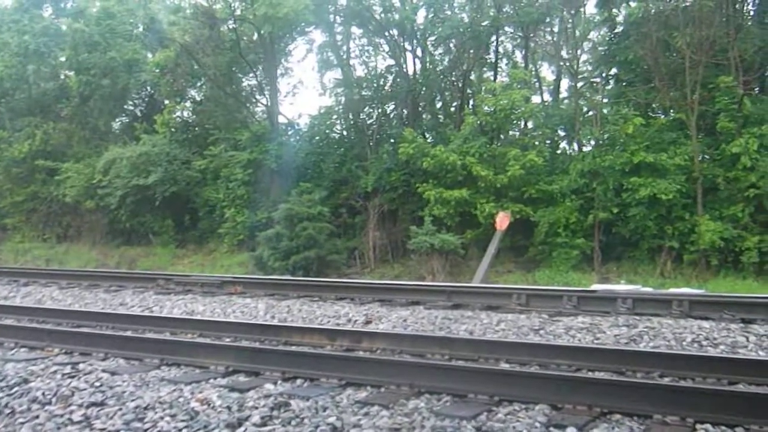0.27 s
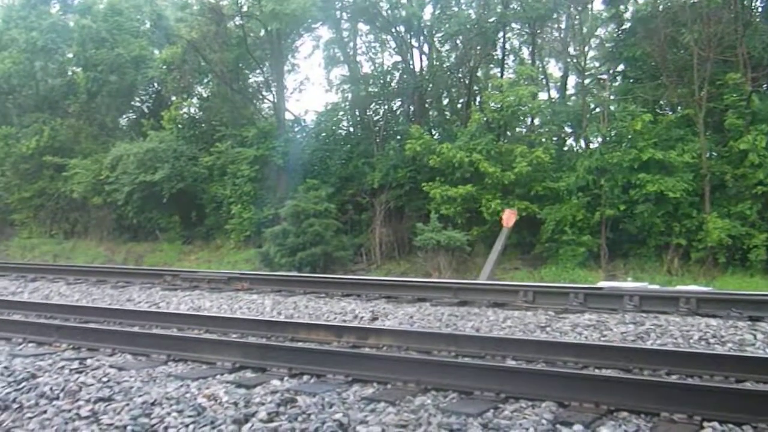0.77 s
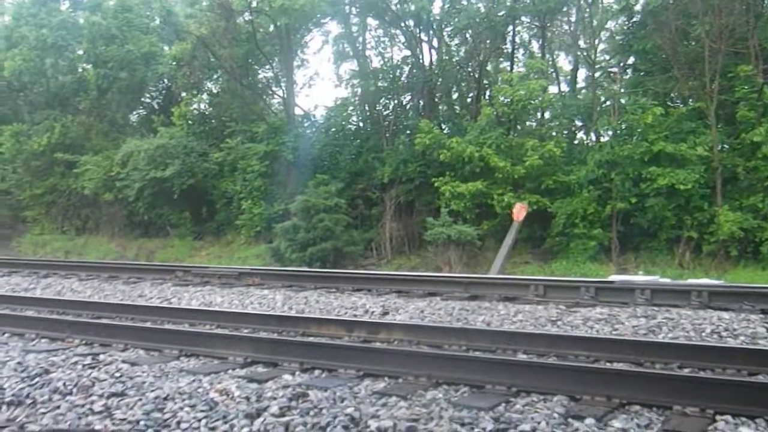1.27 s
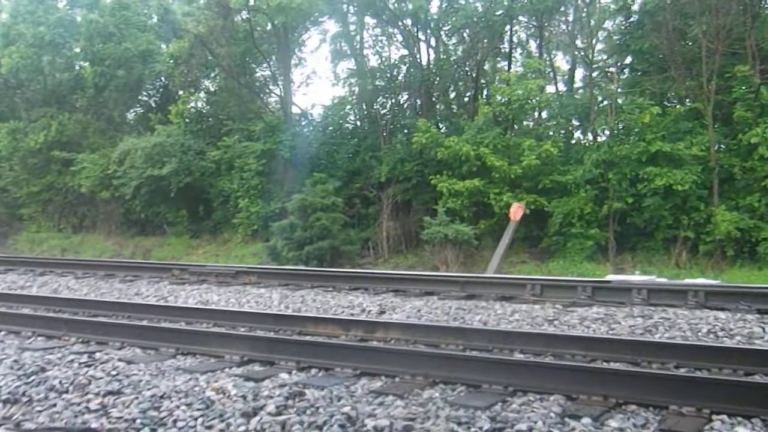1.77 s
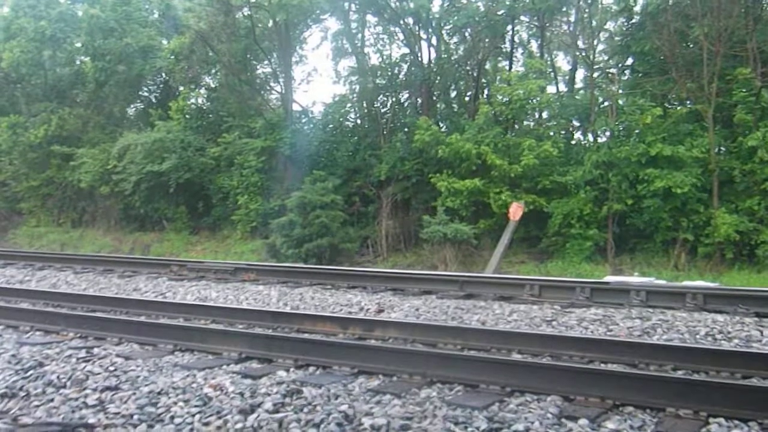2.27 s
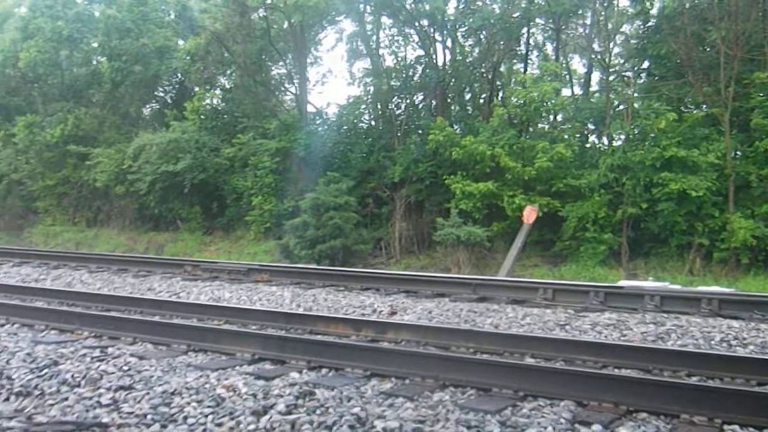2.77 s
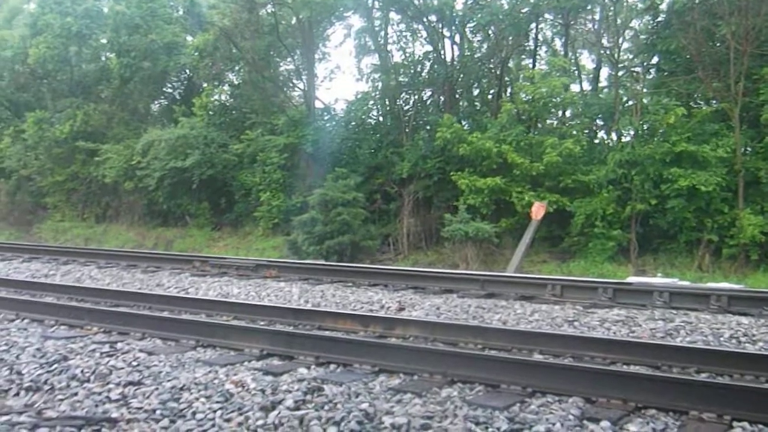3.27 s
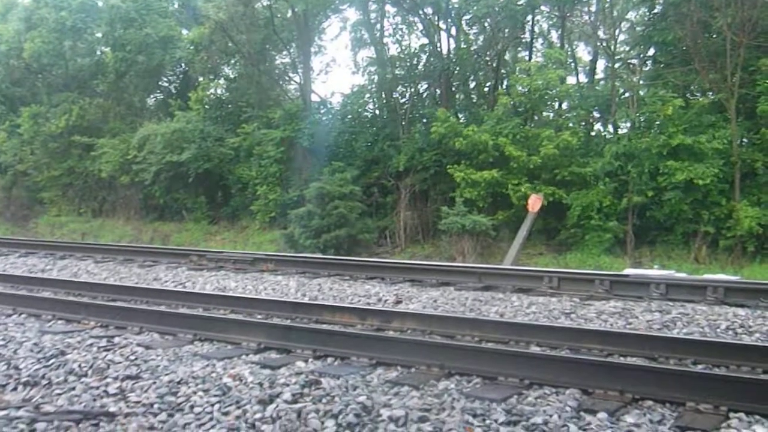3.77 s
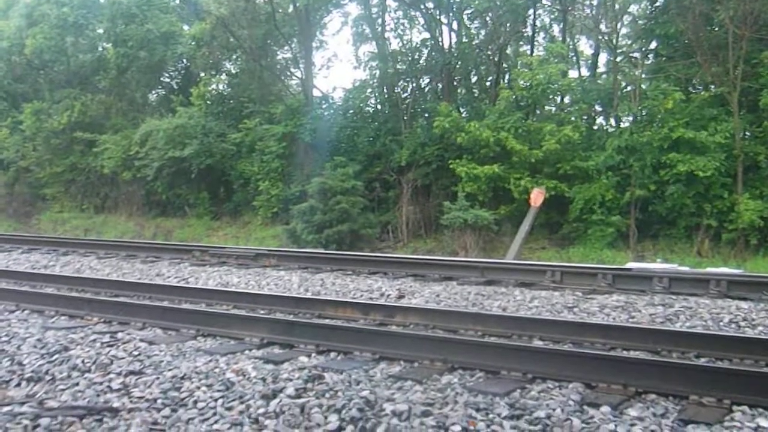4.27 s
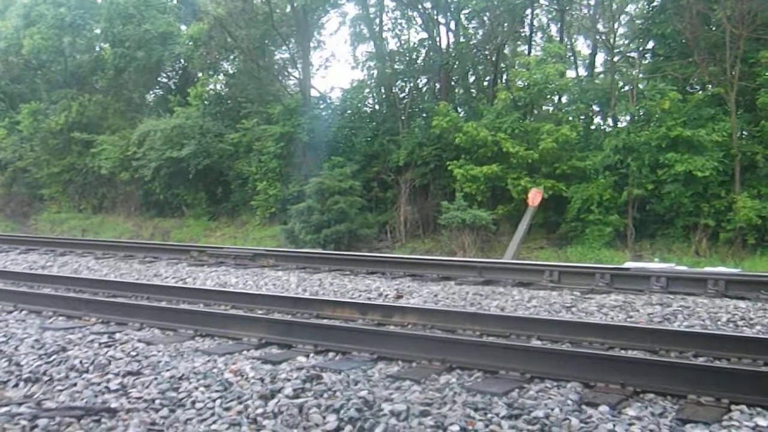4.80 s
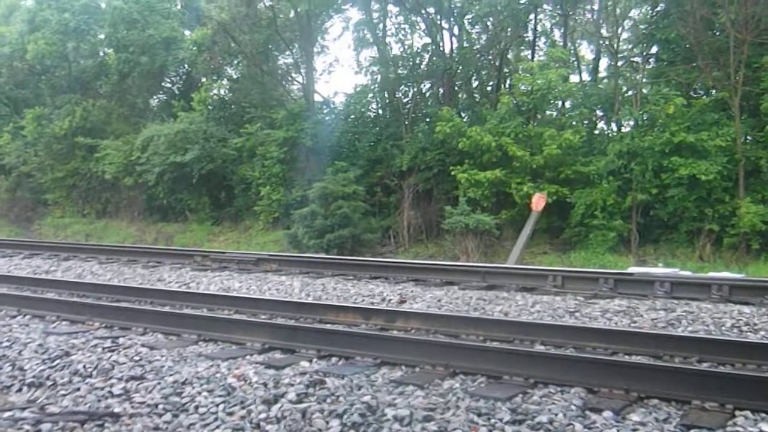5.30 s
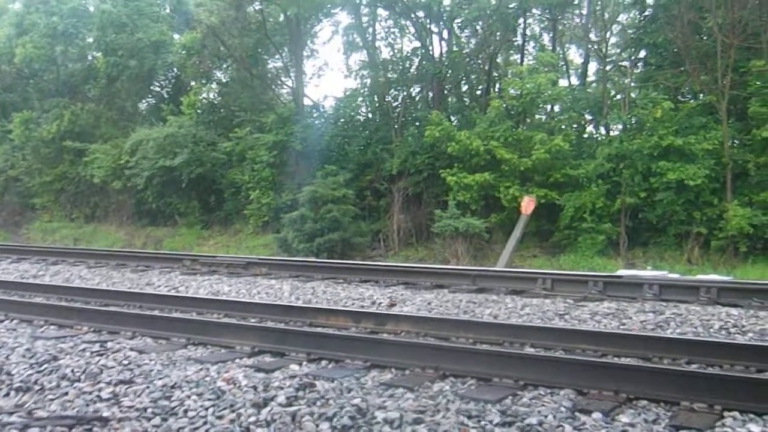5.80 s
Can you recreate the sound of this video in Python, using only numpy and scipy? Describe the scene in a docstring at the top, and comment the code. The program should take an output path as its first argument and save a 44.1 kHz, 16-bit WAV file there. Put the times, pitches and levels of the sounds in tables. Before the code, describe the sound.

Clear falling bird whistles echo from woodland above distant rumble and a thin buzzing camera whine, ending in a rub and small clicks.

```python
"""A cardinal sings from a wood beside a railway line: two rising slurs, then seven falling whistles.
Other birds answer from deeper among the trees. Each note is a gliding sine, and decaying noise spreads
it into the echoes of the trees. Shaped noise makes the steady distant rumble and the hiss of open air.
The camera adds a thin whine, a tone that keeps flipping over, and steady tones. Near the end it is
handled: noise makes the rubbing, and filtered noise bursts make the clicks."""
import sys
import numpy as np
from scipy import signal
from scipy.fft import rfft, irfft
from scipy.io import wavfile
from scipy.ndimage import uniform_filter1d

SR = 44100
rng = np.random.default_rng(int(sys.argv[2]) if len(sys.argv) > 2 else 0)


def materialize(psi):
    """Save the field psi as 16-bit PCM at rate SR to the path in sys.argv[1].

    A 1-D psi becomes a single channel; in a 2-D psi each row is a channel.
    """
    bounded = np.clip(np.atleast_2d(psi).T, -1, 1)
    quanta = np.round(bounded * 32767).astype(np.int16)
    wavfile.write(sys.argv[1], SR, quanta)


N = 266672
TIME = np.arange(N) / SR

# Distant rumble, tone colour: pitch_hz, level_db (per Hz, relative)
RUMBLE_COLOUR = [(6, -8.5), (13, -7), (28, -3), (41, -0.5), (50, -5.5), (60, -4), (80, -6), (98, -9),
                 (115, -8), (145, -17), (210, -19), (300, -30.5), (500, -52.5)]
# Hiss of open air, tone colour: pitch_hz, level_db (per Hz, relative)
AIR_COLOUR = [(100, -2.5), (350, 1.5), (600, 1.5), (1000, 0), (1400, -3.5), (2200, -6.5), (2900, -9),
              (4000, -13.5), (4600, -12.5), (6000, -17.5), (9000, -22), (15500, -33)]
# The rumble grows very slowly from its starting level; the air has no such trend
RUMBLE_START_DB, RUMBLE_GROWTH_DB_PER_S, AIR_DB = -30, 0.2646, -46

# Faint steady tones of the camera: pitch_hz, level_db
CAMERA_TONES = [(2169, -89), (4646, -68), (6971, -68), (11359, -69.5), (11386, -84), (11617, -70),
                (13943, -80)]
# Brief dips in the whine; overlapping dips add up: start_s, length_s, depth_db
WHINE_DIPS = [(5.598, 0.28, -5.5), (5.707, 0.13, -19), (5.901, 0.033, -16), (6.017, .04, -13)]
CLOCK_HZ, FLIP_HZ, FLIP_START_S = 2323.45, 35.2, 3.0
WHINE_DB = -43  # before its filter

# Kinds of note, each one glide: length_s, from_hz, to_hz, bend, attack_s, release_s.
# Bend below 0: quick at first, then levelling off; above 0: gathering speed.
# Some also dip in loudness: dip_at_s, dip_width_s, dip_db
TICK = dict(length_s=0.026, from_hz=8250, to_hz=7260, bend=-2.2, attack_s=0.0059, release_s=.008)
RISING_SLUR = dict(length_s=.425, from_hz=1985, to_hz=4230, bend=1.45, attack_s=.026, release_s=0.11, dip_at_s=.148, dip_width_s=.026, dip_db=-8)
FALLING_SLUR = dict(length_s=.17, from_hz=2640, to_hz=1603, bend=-2.2, attack_s=0.054, release_s=0.12, dip_at_s=0.0666, dip_width_s=.013, dip_db=-16)
FLICK = dict(length_s=0.034, from_hz=4460, to_hz=2340, bend=-1.38, attack_s=.002, release_s=.003)
SHORT_SLUR = dict(length_s=.08, from_hz=3430, to_hz=2740, bend=1.27, attack_s=.024, release_s=0.044, dip_at_s=0.042, dip_width_s=.008, dip_db=-25)
LOW_PIPE = dict(length_s=.135, from_hz=2800, to_hz=2310, bend=-0.52, attack_s=.04, release_s=0.018, dip_at_s=0.058, dip_width_s=0.025, dip_db=-14)
WARBLE_DOWN = dict(length_s=0.04, from_hz=2880, to_hz=2280, bend=0.48, attack_s=0.0034, release_s=0.0072)
WARBLE_UP = dict(length_s=.05, from_hz=2200, to_hz=3290, bend=-0.32, attack_s=0.024, release_s=.015)
PIP = dict(length_s=0.0357, from_hz=2520, to_hz=2885, bend=-1.77, attack_s=.009, release_s=0.015)
RISE = dict(length_s=.05, from_hz=2600, to_hz=3853, bend=-1.6, attack_s=0.011, release_s=.009)
HIGH_FALL = dict(length_s=.055, from_hz=5600, to_hz=4244, bend=-1.8, attack_s=0.005, release_s=0.0048)

# When the birds sing. Note levels are before the direct and echo gains.
# Small bird's runs of thin ticks: start_s, length_s, first_tick_level_db
TWITTERS = [(.791, .105, -61), (1.35, 0.18, -56)]
# Within a twitter: gap between ticks, growth in level, fall in pitch (share of the pitch per second)
TICK_PERIOD_S, TICK_SWELL_DB_PER_S, TICK_SAG_PER_S = 0.0305, 25, 0.26
# Cardinal's rising slurs: start_s, level_db
RISING_SLURS = [(.818, -57.5), (1.652, -52)]
# Cardinal's falling slurs: start_s, level_db
FALLING_SLURS = [(2.206, -43.5), (2.564, -42), (2.928, -41.5), (3.283, -41.5), (3.636, -42), (4.005, -42),
                 (4.357, -43.5)]
# Cardinal's high opening flicks: start_s, level_db
FLICKS = [(3.273, -48.5), (3.634, -55)]
# Second bird's short slurs: start_s, level_db
SHORT_SLURS = [(2.229, -46.5), (2.787, -43)]
# Second bird's low pipes: start_s, level_db
LOW_PIPES = [(2.315, -51.5)]
# Second bird's warbles: start_s, level_db
WARBLES = [(2.29, -52.5), (2.854, -47.5)]
# Far bird's rolling song: start_s, pip_level_db, rise_level_db, high_fall_level_db
ROLLS = [(3.752, -51, -50.5, -55), (4.002, -47.5, -51, -52.5), (4.245, -48.5, -46.5, -50),
         (4.500, -44.5, -45.5, -51.5), (4.745, -46, -46, -52.5), (5.000, -45, -47.5, -52),
         (5.255, -45.5, -61, -61)]

# Handling clicks: start_s, bright_tick_peak_db, case_ring_peak_db
CLICKS = [(5.578, -31, -25.5), (5.618, -38, -39), (5.674, -44, -38), (5.851, -30.5, -46)]
# What the camera's case rings with: pitch_hz, width_hz, level_db (relative)
CASE_MODES = [(1010, 370, 0), (1950, 430, 2)]
# One finger stroke swells to its peak and lets go; the grip rustles on after it
RUB_PEAK_S, RUB_SWELL_S, RUB_RELEASE_S = 5.615, 0.096, 0.009
RUB_DB, GRIP_DB = -41.5, -56.5

TREBLE_LIMIT_HZ = 15750


def undb(db):
    """Turn decibels into a gain to multiply by."""
    return 10 ** (np.asarray(db) / 20)


def unit(x):
    """Scale to an average strength (rms) of 1."""
    return x / np.sqrt(np.mean(x ** 2))


def add(out, start_s, x):
    """Mix x into out from the given time."""
    i = int(start_s * SR)
    out[i:i + len(x)] += x[:max(N - i, 0)]


def walk(rate_hz):
    """Smooth random drift with rms 1: random steps, smoothed twice."""
    k = int(SR / rate_hz)
    steps = np.repeat(rng.standard_normal(N // k + 1), k)
    smooth = uniform_filter1d(uniform_filter1d(steps, k), k)
    return unit(smooth[:N])


def noise(colour):
    """Noise of rms 1, its frequencies weighted by (Hz, dB) points."""
    hz, db = np.transpose(colour)
    bins_hz = np.maximum(np.fft.rfftfreq(N, 1 / SR), 1)
    gain = undb(np.interp(np.log(bins_hz), np.log(hz), db))
    return unit(irfft(rfft(rng.standard_normal(N)) * gain, N))


def resonance(x, hz, width_hz):
    """Favour one pitch, as a ringing object does (a two-pole filter)."""
    b, a = signal.iirpeak(hz, hz / width_hz, fs=SR)
    return signal.lfilter(b, a, x)


def background():
    """Distant rumble under the soft hiss of open air, both shaped noise with a tiny drift in level."""
    rumble_db = RUMBLE_START_DB + RUMBLE_GROWTH_DB_PER_S * TIME + 0.1 * walk(4.5)
    rumble = noise(RUMBLE_COLOUR) * undb(rumble_db)
    air = noise(AIR_COLOUR) * undb(AIR_DB + 0.19 * walk(4.95))
    return rumble + air


def camera_whine(imbalance=0.12, width_hz=6000, fade_s=0.013):
    """The fourth harmonic of a clock flips polarity at a steady rate, which gives it a buzzing edge."""
    whine_hz = 4 * CLOCK_HZ
    flips = np.sign(np.sin(2 * np.pi * FLIP_HZ * (TIME - FLIP_START_S)))
    carrier = np.sin(2 * np.pi * whine_hz * TIME)
    # the imbalance lets a little of the unflipped tone through
    whine = resonance(carrier * (flips + imbalance), whine_hz, width_hz)
    dip_db = np.zeros(N)
    for start_s, length_s, depth_db in WHINE_DIPS:
        dip_db += depth_db * ((TIME > start_s) & (TIME < start_s + length_s))
    dip_db = uniform_filter1d(dip_db, int(fade_s * SR))
    tones = sum(undb(db) * np.sin(2 * np.pi * hz * TIME) for hz, db in CAMERA_TONES)
    return np.sqrt(2) * (whine * undb(WHINE_DB + dip_db) + tones)  # a plain sine's rms is 1 / sqrt(2)


def glide(length_s, from_hz, to_hz, bend, attack_s, release_s, dip_at_s=0, dip_width_s=1, dip_db=0):
    """Pitch and loudness of one note: an exponential glide that fades in and out."""
    t = np.arange(0, length_s, 1 / SR)
    progress = np.expm1(bend * t / length_s) / np.expm1(bend)
    pitch_hz = from_hz + (to_hz - from_hz) * progress
    attack = np.sin(np.pi / 2 * np.clip(t / attack_s, 0, 1)) ** 2
    release = np.sin(np.pi / 2 * np.clip((length_s - t) / release_s, 0, 1)) ** 2
    dip = undb(dip_db * np.exp(-((t - dip_at_s) / dip_width_s) ** 2))
    return pitch_hz, attack * release * dip


def whistles(kind, notes, waver=0.0032, flutter_db=1.0, tuning=1):
    """A nearly pure tone runs through the same glide at each note, with random pitch and level drift."""
    pitch_hz, swell = glide(**kind)
    drift, flutter = walk(150), walk(90)
    out = np.zeros(N)
    for start_s, level_db in notes:
        now = int(start_s * SR) + np.arange(len(pitch_hz))
        wavering_hz = tuning * pitch_hz * (1 + waver * drift[now])
        phase = 2 * np.pi * np.cumsum(wavering_hz) / SR
        loudness = swell * undb(level_db + flutter_db * flutter[now])
        add(out, start_s, np.sqrt(2) * np.sin(phase) * loudness)
    return out


def woods(x, t60, build_s, near_share, near_s):
    """Near trunks return a quick cluster of echoes, the depth of the wood a long faint tail."""
    t = TIME[:2 * SR]
    near = unit(np.exp(-t / near_s))
    # t60: seconds for the tail to fall by 60 dB
    deep = unit((1 - np.exp(-t / build_s)) * np.exp(-np.log(1000) * t / t60))
    strength = np.sqrt(near_share * near ** 2 + (1 - near_share) * deep ** 2)
    echoes = rng.standard_normal(len(t)) * strength
    return signal.fftconvolve(x, echoes / np.linalg.norm(echoes))[:N]


def small_bird(echo_db=-3):
    """Two twitters of thin falling ticks, each tick a little louder and lower than the last."""
    ticks = np.zeros(N)
    for start_s, length_s, first_db in TWITTERS:
        for t in np.arange(0, length_s, TICK_PERIOD_S):
            note = (start_s + t, first_db + TICK_SWELL_DB_PER_S * t)
            ticks += whistles(TICK, [note], waver=0.012, tuning=1 - TICK_SAG_PER_S * t)
    echoes = woods(ticks, t60=0.4, build_s=0.0089, near_share=0.26, near_s=0.017)
    return ticks + undb(echo_db) * echoes


def cardinal(direct_db=-0.4, echo_db=-3, rise_echo_db=-1):
    """Rising then falling slurs from the edge of the wood; two falls have a quick high flick as echo."""
    rises = whistles(RISING_SLUR, RISING_SLURS, waver=0.0059, flutter_db=2.5)
    falls = whistles(FALLING_SLUR, FALLING_SLURS, waver=0.0075, flutter_db=0.2)
    into_woods = undb(rise_echo_db) * rises + undb(echo_db) * falls
    echoes = woods(into_woods, t60=0.64, build_s=0.026, near_share=0.33, near_s=0.043)
    flicks = woods(whistles(FLICK, FLICKS), t60=0.88, build_s=0.02, near_share=0.73, near_s=0.014)
    return undb(direct_db) * (rises + falls) + echoes + flicks


def second_bird(echo_db=-4, turn_s=0.077, upturn_db=-4):
    """Two short fluty phrases between the cardinal's notes; their warble, down and up, arrives blurred."""
    clear = whistles(SHORT_SLUR, SHORT_SLURS) + whistles(LOW_PIPE, LOW_PIPES)
    upturns = [(start_s + turn_s, db + upturn_db) for start_s, db in WARBLES]
    warble = whistles(WARBLE_DOWN, WARBLES, waver=0.02)
    warble += whistles(WARBLE_UP, upturns, waver=0.023)
    into_woods = undb(echo_db) * clear + warble
    return clear + woods(into_woods, t60=0.87, build_s=0.012, near_share=0.24, near_s=0.025)


def far_bird(pip_direct_db=-3.0, pip_echo_db=-3, repeat_s=0.043, repeat_db=-5,
             rise_after_s=0.062, fall_after_s=0.15):
    """A double pip, a rise and a high fall roll four times a second; the sweeps arrive only as echoes."""
    out = np.zeros(N)
    for start_s, pip_db, rise_db, fall_db in ROLLS:
        pips = [(start_s, pip_db), (start_s + repeat_s, pip_db + repeat_db)]
        pip = whistles(PIP, pips, waver=0.021, flutter_db=2.0)
        rise = whistles(RISE, [(start_s + rise_after_s, rise_db)], waver=0.01)
        fall = whistles(HIGH_FALL, [(start_s + fall_after_s, fall_db)], waver=0.01)
        # the bird turns as it sings, so each motif finds other paths through the trees
        into_woods = undb(pip_echo_db) * pip + rise
        out += undb(pip_direct_db) * pip
        out += woods(into_woods, t60=1.0, build_s=0.0057, near_share=0.15, near_s=0.039)
        # the leaves scatter the top of the song most
        out += woods(fall, t60=1.1, build_s=0.0061, near_share=0.095, near_s=0.028)
    return out


def rubbing(grit_db=3.5):
    """Fingers rub the case: dull noise follows their pressure, roughened by a fast random drift."""
    since = TIME - RUB_PEAK_S
    stroke = np.exp(-np.abs(since) / np.where(since < 0, RUB_SWELL_S, RUB_RELEASE_S))
    pressure = undb(RUB_DB) * stroke + undb(GRIP_DB) * (since > 0)
    grit = undb(grit_db * walk(300))
    colour = [(100, 3), (400, 9), (1100, 2.0), (2000, -6.0), (5000, -30), (15000, -35)]
    return noise(colour) * pressure * grit


def clicks(dull_hz=9000, tick_hz=4900, tick_width_hz=4200, decay_s=0.0014):
    """Each contact is a tiny noise burst, heard as a bright tick and as the ring of the case."""
    out = np.zeros(N)
    t = TIME[:SR // 20]
    dulling = signal.butter(4, dull_hz, fs=SR, output="sos")
    for start_s, tick_db, ring_db in CLICKS:
        burst = rng.standard_normal(len(t)) * np.exp(-t / decay_s)
        contact = signal.sosfilt(dulling, burst)
        tick = resonance(contact, tick_hz, tick_width_hz)
        ring = sum(undb(db) * resonance(contact, hz, width_hz) for hz, width_hz, db in CASE_MODES)
        tick *= undb(tick_db) / np.abs(tick).max()
        ring *= undb(ring_db) / np.abs(ring).max()
        add(out, start_s, tick + ring)
    return out


def scene():
    """Background, camera and birds at one microphone."""
    birds = small_bird() + cardinal() + second_bird() + far_bird()
    camera = camera_whine() + rubbing() + clicks()
    return (background() + birds + camera)[None]


def record(dry):
    """The camera cuts the top of the treble with a steep filter."""
    treble_cut = signal.ellip(12, 0.1, 80, TREBLE_LIMIT_HZ, fs=SR, output="sos")
    return signal.sosfilt(treble_cut, dry)


dry = scene()
out = record(dry)
materialize(out)
```